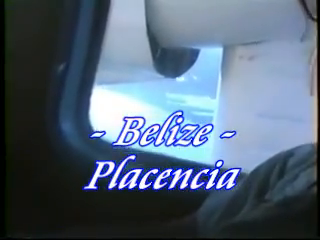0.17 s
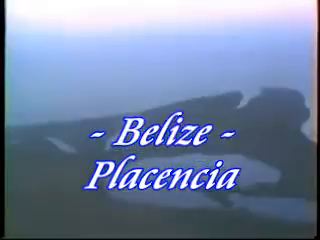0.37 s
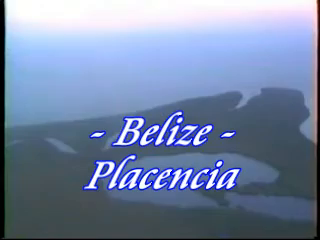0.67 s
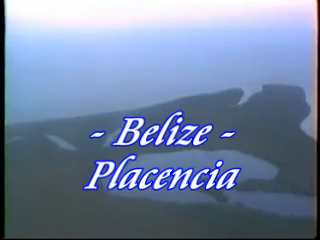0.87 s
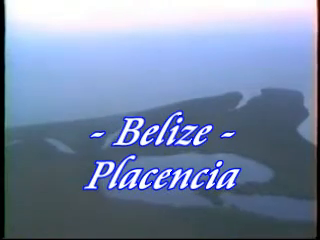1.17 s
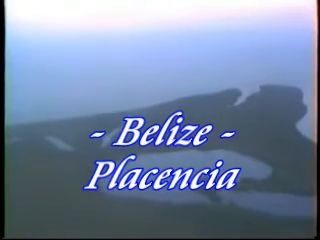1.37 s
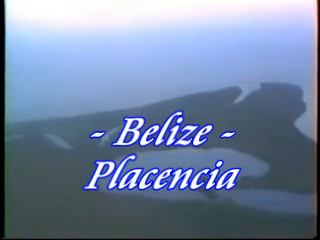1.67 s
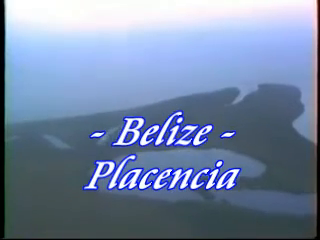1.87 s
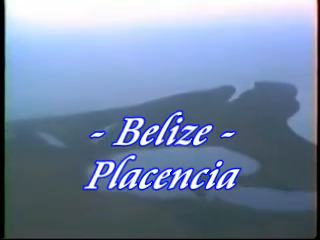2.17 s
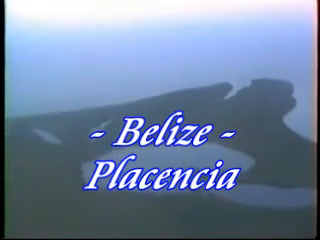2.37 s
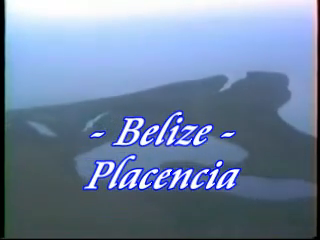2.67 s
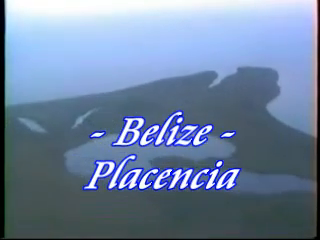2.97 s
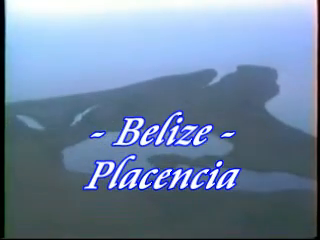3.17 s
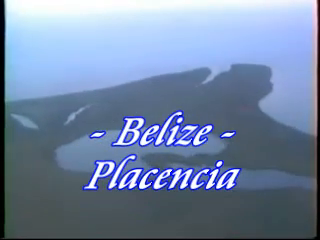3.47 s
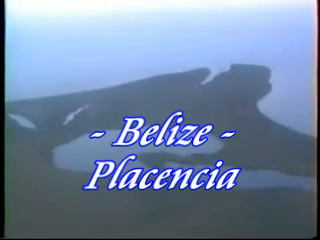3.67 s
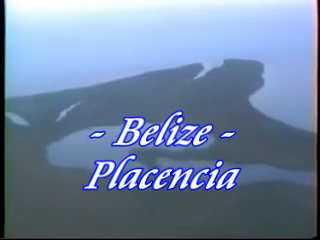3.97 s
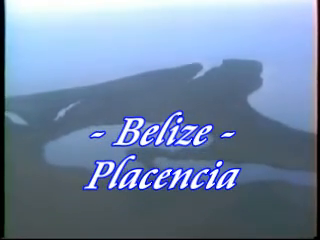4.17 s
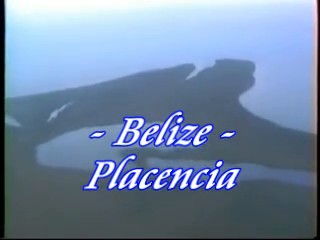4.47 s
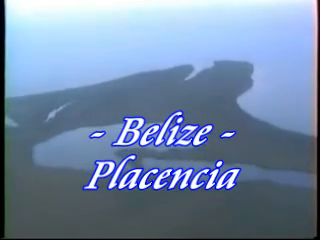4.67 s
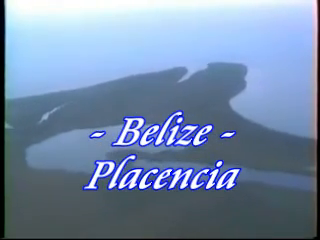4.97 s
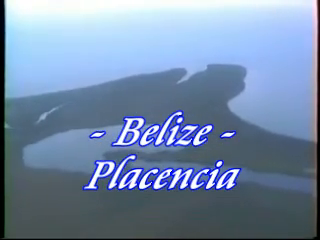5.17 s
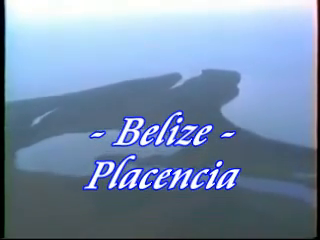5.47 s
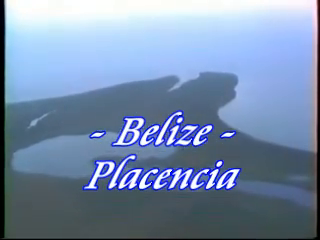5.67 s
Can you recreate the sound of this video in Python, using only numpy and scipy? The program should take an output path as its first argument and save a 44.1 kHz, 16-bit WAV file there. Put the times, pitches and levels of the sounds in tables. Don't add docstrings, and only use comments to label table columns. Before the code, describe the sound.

Inside a light propeller plane at cruise, a steady droning engine boom throbs under rough, wide air roar, with an abrupt change of tone early on.

```python
import sys
import numpy as np
from scipy import signal
from scipy.fft import rfft, irfft
from scipy.io import wavfile
from scipy.ndimage import uniform_filter1d

SR = 44100
rng = np.random.default_rng(int(sys.argv[2]) if len(sys.argv) > 2 else 0)


def store_wav(level_fs):
    pcm = np.round(np.clip(np.atleast_2d(level_fs), -1, 1) * 32767)
    wavfile.write(sys.argv[1], SR, pcm.T.astype(np.int16))


def decibels_to_gain(level_db):
    exponent = np.asarray(level_db, float) / 20
    return 10 ** exponent


N = 256662

# time in seconds, turns in Hz.
SHAFT_SPEED = [(0, 39.4), (.47, 39.4), (.49, 37.68), (5.82, 37.68)]
# order of the shaft, gain up to the pressure at the microphone in dB.
BOOM_ORDERS = [(2, 16.5), (3, 10.5), (4, 8)]
# order of the shaft, peak level in dB.
FAINT_ORDERS = [(1, -40.5), (1.5, -22.5), (5, -44.5), (6, -23)]
# order of the shaft, level against order 2 in dB.
SWELLING_OVERTONES = [(8, -17.5), (9, -23), (10, -32)]
# time in seconds, share of the way from 0 to 1.
MICROPHONE_WALK = [(.49, 0.17), (1.0, 0.13), (1.8, 0.45), (2.5, 0.53), (3.0, 0.74), (3.5, 0.87), (4.4, 0.9),
                   (5.82, 0.95)]
# level at a crest in dB, half waves from a crest at the
STANDING_WAVES = [(-25, 0.077, 0.54, 0.042), (-26, -0.44, 1.04, -.1), (-22, -0.011, 1, -0.3)]
FIRST_SEAT_LEVELS = [-34, -29, -18.5]
# frequency in Hz, density in dB per Hz.
ROAR_SPECTRUM = [(20, 2.5), (50, -1.5), (100, -4.5), (200, 0.5), (330, -6), (520, -12), (750, -18),
                 (1100, -15.5), (1500, -23.5), (2200, -19.5), (3000, -25.5), (4500, -29), (7000, -29.5),
                 (15000, -57.5)]
# time in seconds, level in dB, panel resonance in Hz.
TRIM_BUZZ = [
    (.09, -27.5, 793),
]
# time in seconds, first notch in Hz.
HEAD_NOTCH = [(.431, 3060), (.85, 3180), (1.18, 3780), (1.75, 3520), (2.9, 4180), (3.95, 5700),
              (5.82, 6400)]
# time in seconds, peak level in dB.
SPLICE_CLICK = [
    (0.021, -23),
]

SEAT_CHANGE_S, SEAT_BLEND_S = 0.58, 0.013
FIRST_FAINT_DB = -3
FIRST_ROAR_DB, ROAR_DB, ROAR_GAIN_DB = -24.5, -19, 2.5
RUMBLE_GAIN_DB, RUMBLE_HZ = -6, 330
EXHAUST_LEAD_RAD = 0.9
FIRST_NOTCH_HZ = 6240
OVERLOAD = 0.2


def engine(shaft_hz, booms, faint_db, spread_rad=0.019, waver_db=0.4):
    turn = 2 * np.pi * np.cumsum(shaft_hz) / SR
    orders = [(k, decibels_to_gain(gain_db) * boom) for (k, gain_db), boom in zip(BOOM_ORDERS, booms)]
    second_order = np.abs(orders[0][1])
    orders += [(k, decibels_to_gain(db + faint_db)) for k, db in FAINT_ORDERS]
    orders += [(k, decibels_to_gain(db) * second_order) for k, db in SWELLING_OVERTONES]
    total = np.zeros(N)
    for k, size in orders:
        phase = k * turn - spread_rad * k ** 3 + EXHAUST_LEAD_RAD * (k == 3)
        total += decibels_to_gain(waver_db * drift(1.0)) * np.real(size * np.exp(1j * phase))
    return total


def cabin(place, second):
    booms = []
    for (crest_db, end, crossed, left), first_db in zip(STANDING_WAVES, FIRST_SEAT_LEVELS):
        angle = np.pi * (end + crossed * (1 - place))
        wave = np.cos(angle) + 1j * left * np.sin(angle)
        booms.append((1 - second) * decibels_to_gain(first_db) + second * decibels_to_gain(crest_db) * wave)
    return booms


def slipstream(roar_db, rumble_db):
    roar = coloured(ROAR_SPECTRUM)
    rumble = butter(roar, order=1, hz=RUMBLE_HZ, kind="low")
    gusts_db = 0.5 * drift(3.0)
    return decibels_to_gain(roar_db + gusts_db) * (roar + (decibels_to_gain(rumble_db) - 1) * rumble)


def rattle(length_s=0.07, width=0.064):
    t, noise = np.arange(N) / SR, rng.standard_normal(N)
    total = np.zeros(N)
    for s, db, hz in TRIM_BUZZ:
        buzz = rms_one(butter(noise, order=1, hz=[hz * (1 - width), hz * (1 + width)], kind="band"))
        total += decibels_to_gain(db) * np.exp(-((t - s) / length_s) ** 2) * buzz
    return total


def scene():
    t = np.arange(N) / SR
    place, = in_time(MICROPHONE_WALK)
    shaft_hz, = in_time(SHAFT_SPEED)
    second = np.clip((t - SEAT_CHANGE_S) / SEAT_BLEND_S / 2 + 0.5, 0, 1)
    roar_db = np.where(at_first_seat(), FIRST_ROAR_DB, ROAR_DB + ROAR_GAIN_DB * place)
    motor = engine(shaft_hz, cabin(place, second), FIRST_FAINT_DB * (1 - second))
    air = slipstream(roar_db, RUMBLE_GAIN_DB * (place - 0.3))
    return np.tile(motor + air + rattle(), (2, 1))


def rms_one(x):
    return x / np.sqrt(np.mean(x ** 2) + 1e-20)


def in_time(rows):
    s, *columns = np.transpose(rows)
    return [np.interp(np.arange(N) / SR, s, c) for c in columns]


def at_first_seat():
    return np.arange(N) < HEAD_NOTCH[0][0] * SR


def drift(rate_hz):
    r = np.exp(-2 * np.pi * rate_hz / SR)
    return rms_one(signal.lfilter([1], [1, -2 * r, r * r], rng.standard_normal(N + SR))[SR:])


def coloured(spectrum):
    hz, db = np.transpose(spectrum)
    grid = np.maximum(np.fft.rfftfreq(N, 1 / SR), 1)
    gain = decibels_to_gain(np.interp(np.log(grid), np.log(hz), db))
    return rms_one(irfft(rfft(rng.standard_normal(N)) * gain, N))


def butter(x, order, hz, kind):
    return signal.sosfilt(signal.butter(order, hz, kind, fs=SR, output="sos"), x)


def overload(x):
    over = x / OVERLOAD
    return OVERLOAD * over / (1 + np.abs(over) ** 6.97) ** (1 / 7.86)


def low_cut(x, hz=113, q=1.25, pole_hz=140):
    w = 2 * np.pi * hz
    peaky = signal.lfilter(*signal.bilinear([1, 0, 0], [1, w / q, w * w], SR), x)
    return butter(peaky, order=1, hz=pole_hz, kind="high")


def tilted_head(x):
    at, total = np.arange(N), np.cumsum(x)
    wandering_hz = in_time(HEAD_NOTCH)[0] * (1 + 0.012 * drift(5.0))
    half = SR / np.where(at_first_seat(), FIRST_NOTCH_HZ, wandering_hz) / 2
    return (np.interp(at + half, at, total) - np.interp(at - half, at, total)) / (2 * half)


def transfer(x, lean_db=-21.5, grit_db=-26.5, air_db=-13):
    upper = x
    for _ in range(2):
        upper = butter(upper, order=3, hz=650, kind="high")[::-1]
    grit = decibels_to_gain(grit_db) * upper + decibels_to_gain(air_db) * butter(x, order=2, hz=4500, kind="high")
    side = grit * drift(60) - decibels_to_gain(lean_db) * butter(upper, order=1, hz=4000, kind="low")
    return np.array([x + side, x - side])


def line_noise():
    shared, own = butter(rng.standard_normal((2, N)), order=1, hz=[2500, 11500], kind="band")
    return decibels_to_gain(-58.3) * (shared + 0.45 * own * [[1], [-1]])


def treble_gate(x, step_db=-80, spare_db=3.6, band_db=-6, whim_db=1.5):
    window = np.sin(np.pi * (np.arange(2048) + 0.5) / 2048)
    padded = np.pad(x, [(0, 0), (0, 4096)], "reflect")
    hz, s, lines = signal.stft(padded, SR, window, 2048, 1024, boundary="even")
    index = np.arange(len(hz))
    spare = np.minimum(rng.exponential(1, len(s)), 2.2)
    whim = rng.standard_normal((65, len(s)))[index // 16]
    step = decibels_to_gain(step_db - spare_db * spare + whim_db * whim)
    step = step * decibels_to_gain(np.clip((hz[:, None] - 5900) / 400, -4, 0))
    power = uniform_filter1d(np.abs(lines) ** 2, size=16, axis=1)
    band = np.sqrt(power)[:, np.minimum(index // 16 * 16 + 8, 1024)]
    kept = (np.abs(lines) > step) & (band > step * decibels_to_gain(band_db)) | (hz[:, None] < 2500)
    return signal.istft(lines * kept, SR, window, 2048, 1024)[1][:, :N]


def splice(x):
    for s, peak_db in SPLICE_CLICK:
        start = round(s * SR)
        x[:, start:] += decibels_to_gain(peak_db + 10.5) * np.exp(-np.arange(N - start) / (0.0021 * SR))
    return x


def top_cut(x):
    return signal.sosfilt(signal.butter(12, 14300, fs=SR, output="sos"), x)


def record(dry):
    hiss = decibels_to_gain(-43.5) * butter(rng.standard_normal(N), order=1, hz=3500, kind="high")
    tape = tilted_head(low_cut(overload(dry[0])) + hiss)
    tape = decibels_to_gain(-1.5) * butter(tape, order=6, hz=6420, kind="low")
    out = treble_gate(transfer(tape) + line_noise())
    return top_cut(splice(out))


dry = scene()
out = record(dry)
store_wav(out)
```